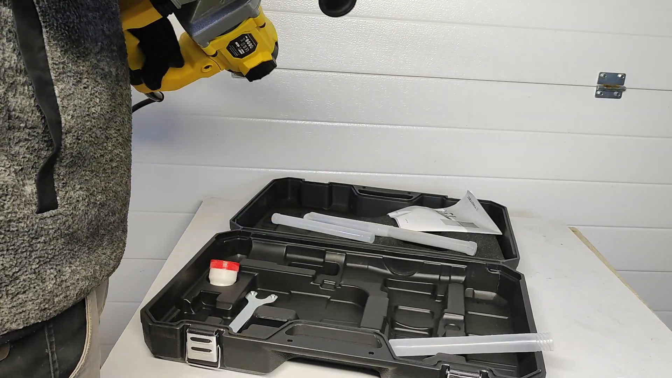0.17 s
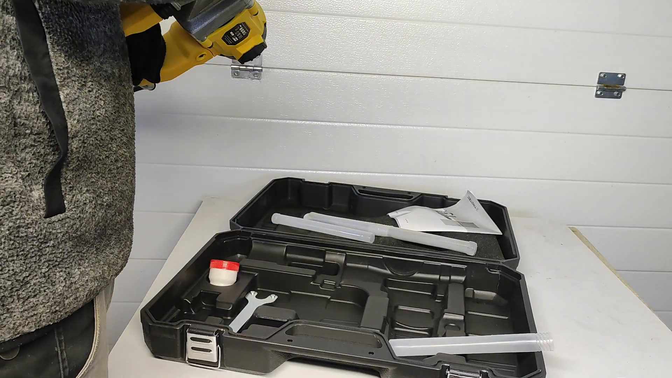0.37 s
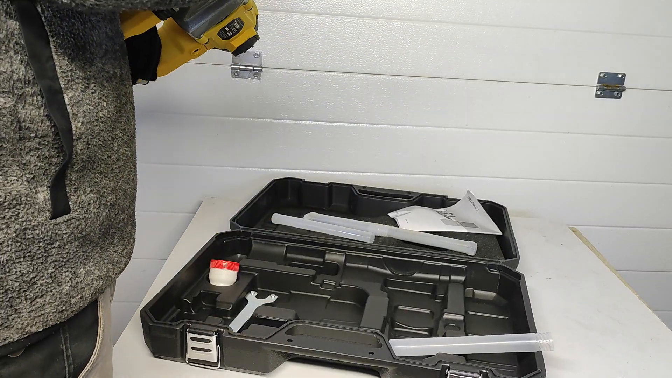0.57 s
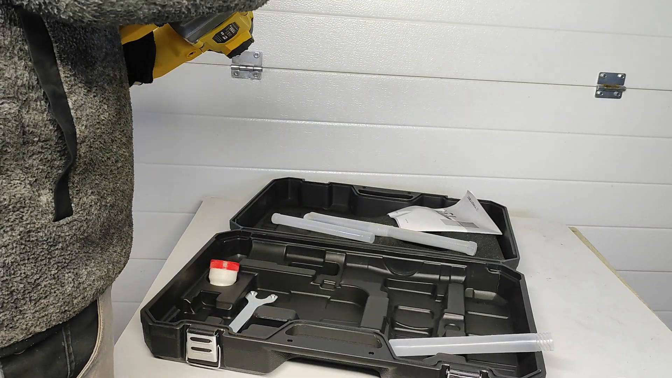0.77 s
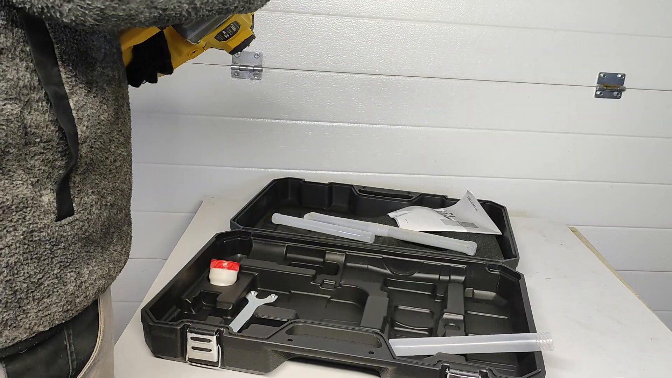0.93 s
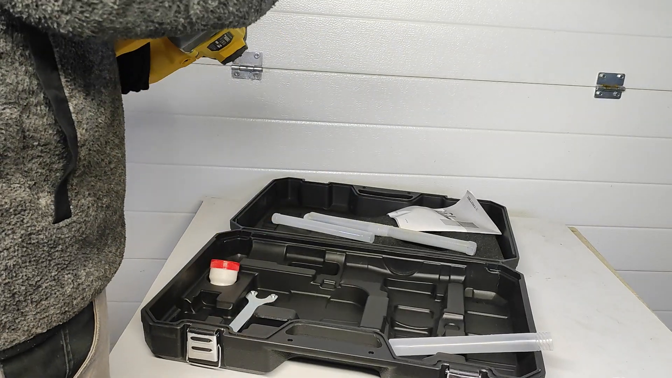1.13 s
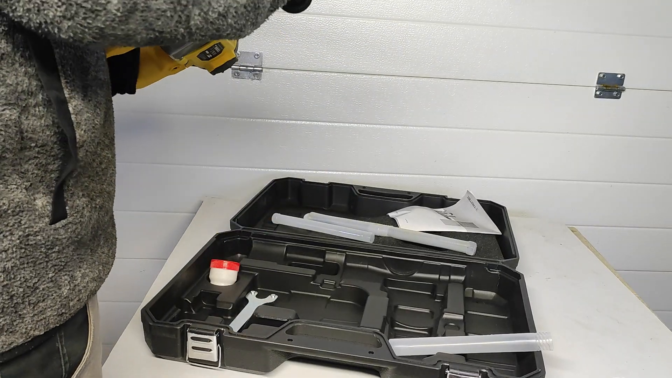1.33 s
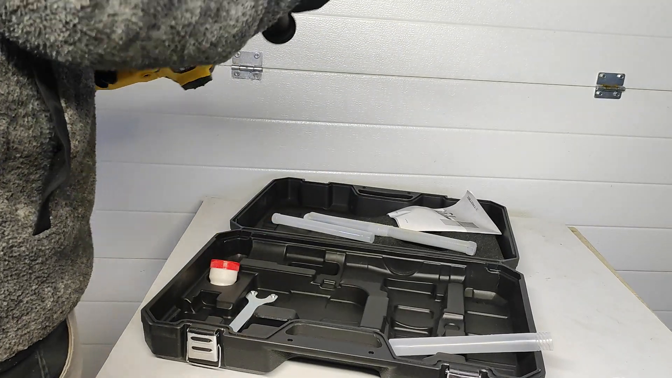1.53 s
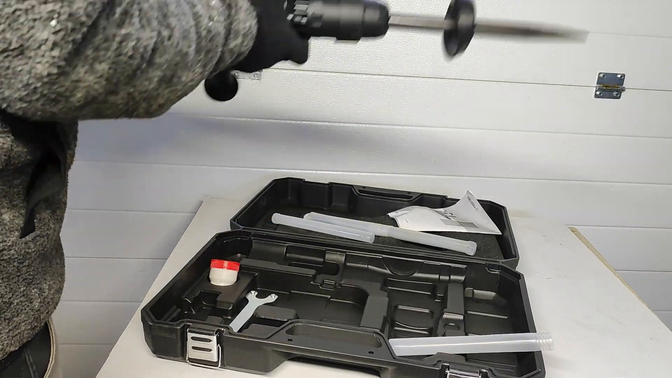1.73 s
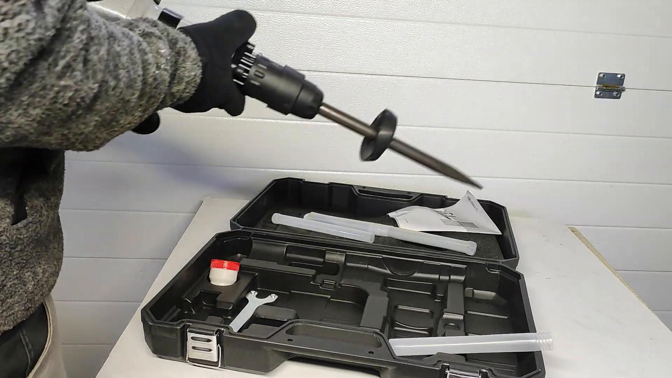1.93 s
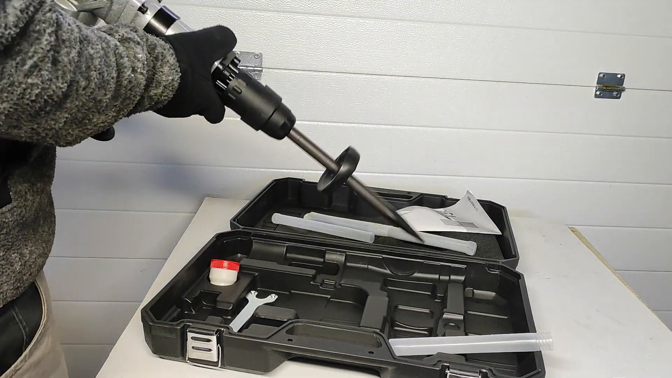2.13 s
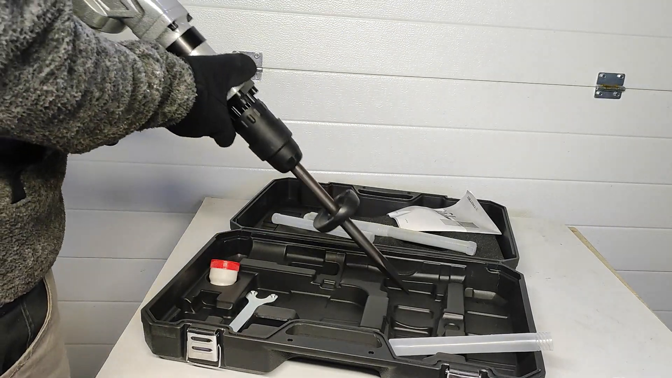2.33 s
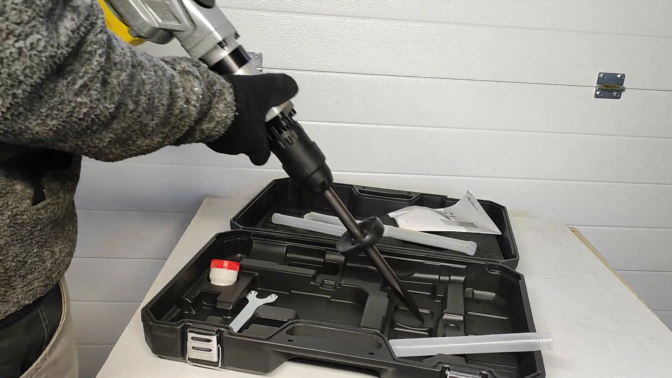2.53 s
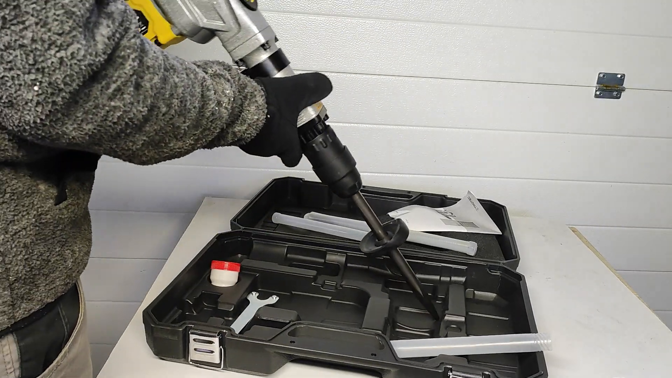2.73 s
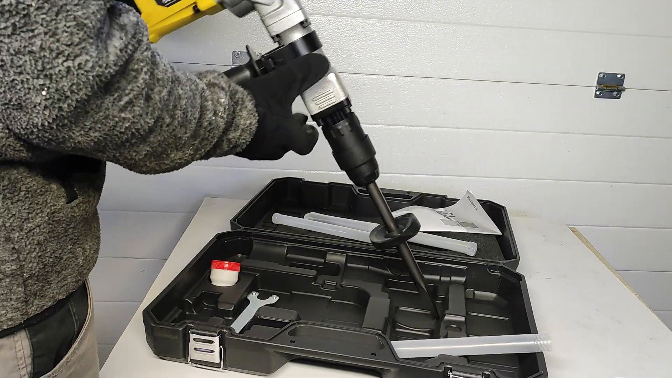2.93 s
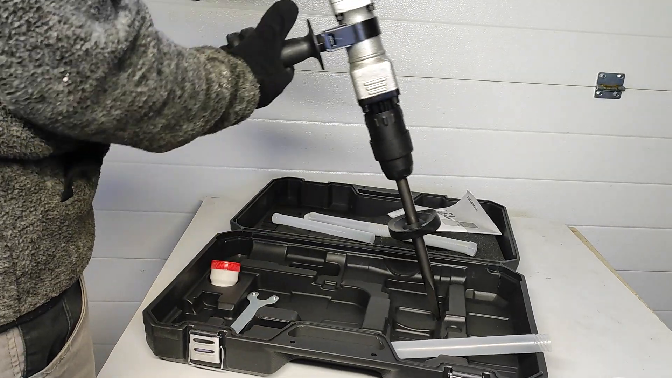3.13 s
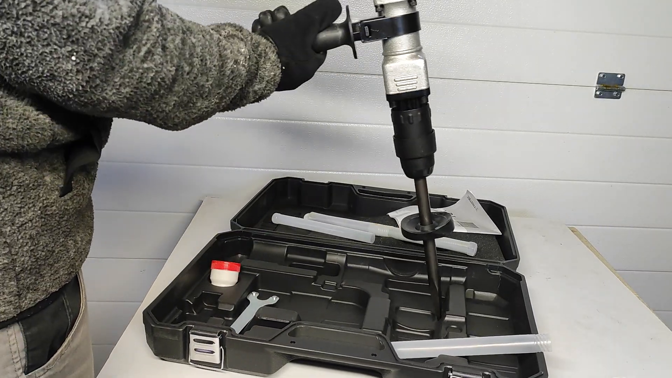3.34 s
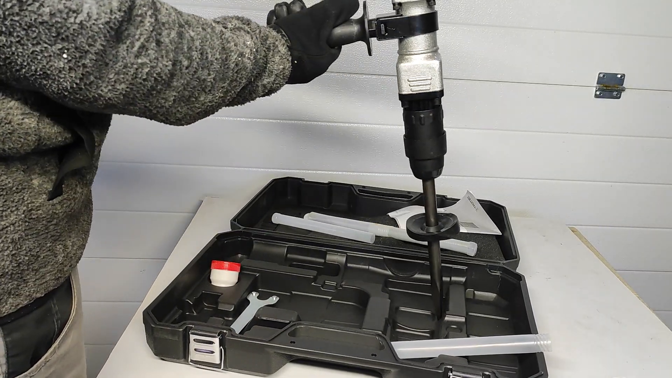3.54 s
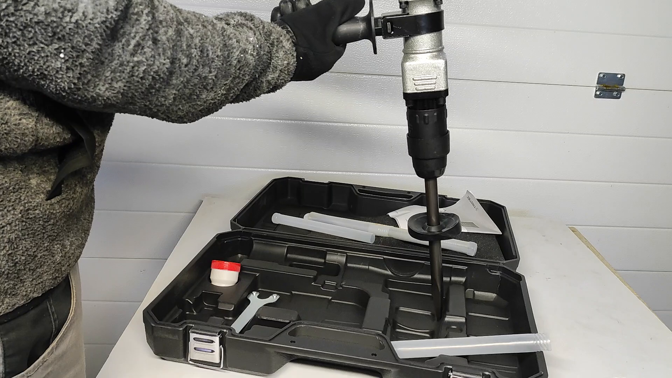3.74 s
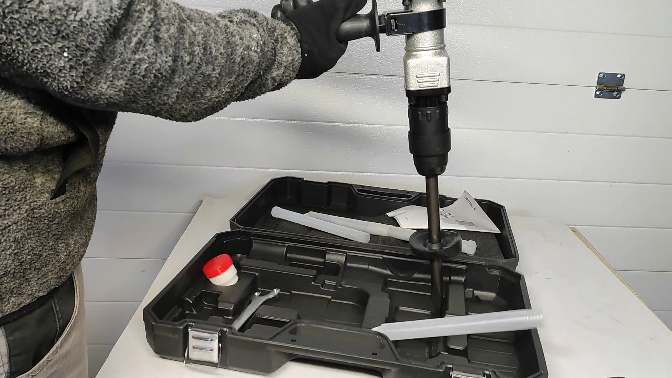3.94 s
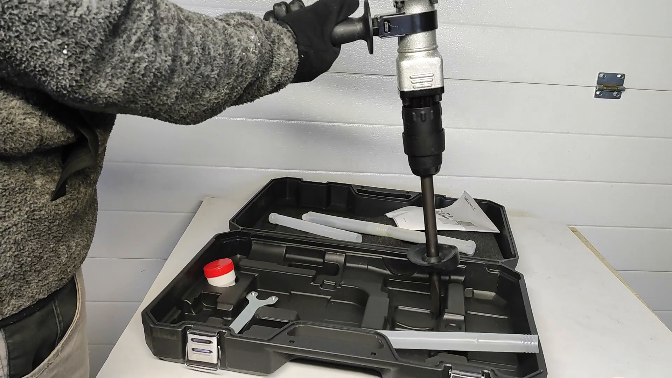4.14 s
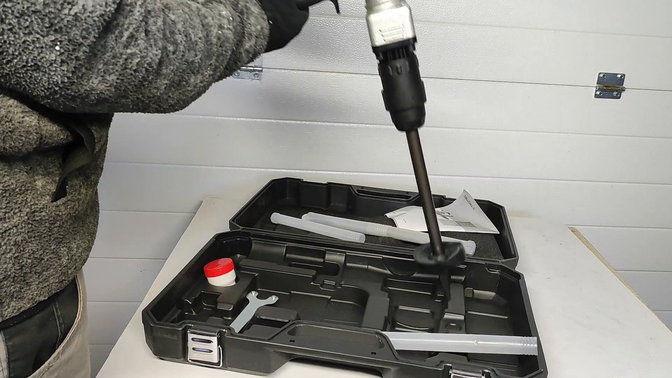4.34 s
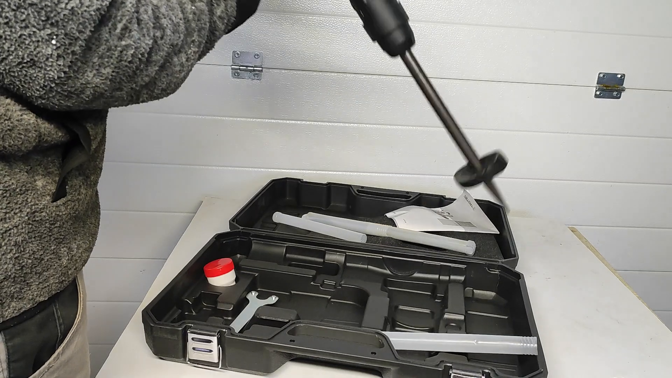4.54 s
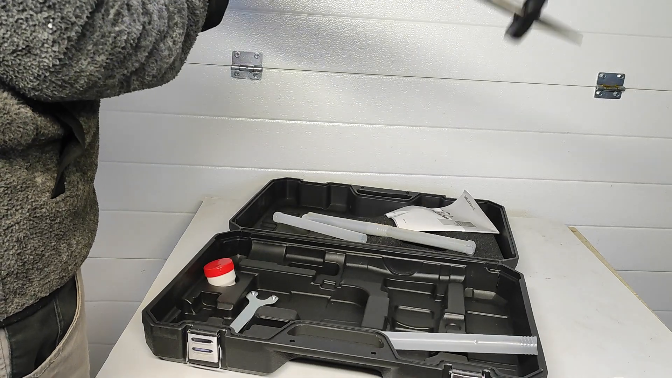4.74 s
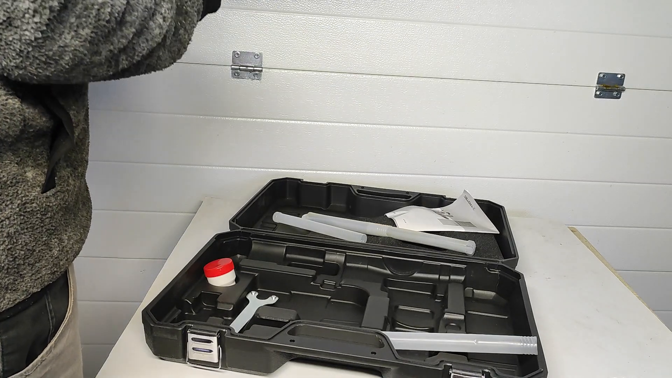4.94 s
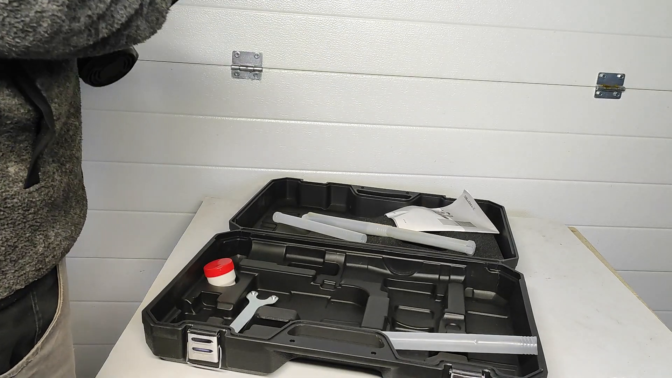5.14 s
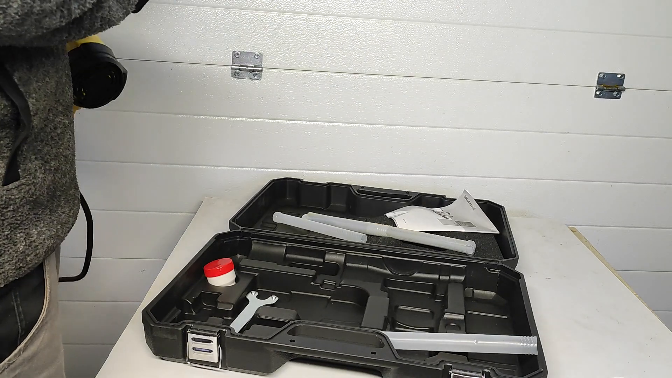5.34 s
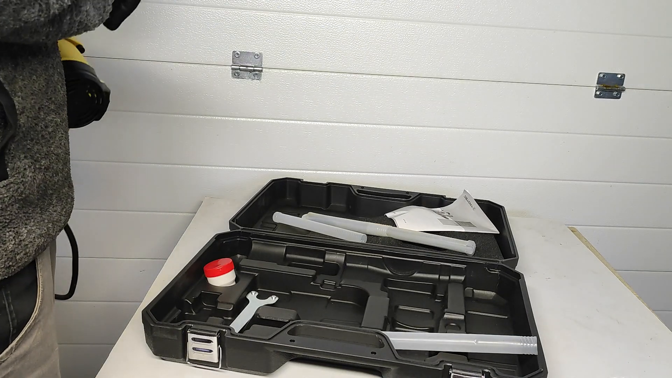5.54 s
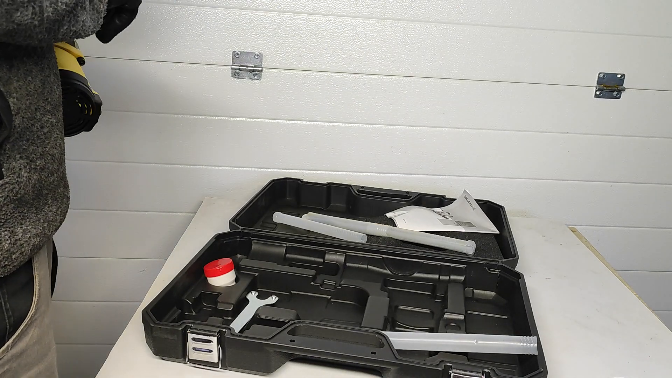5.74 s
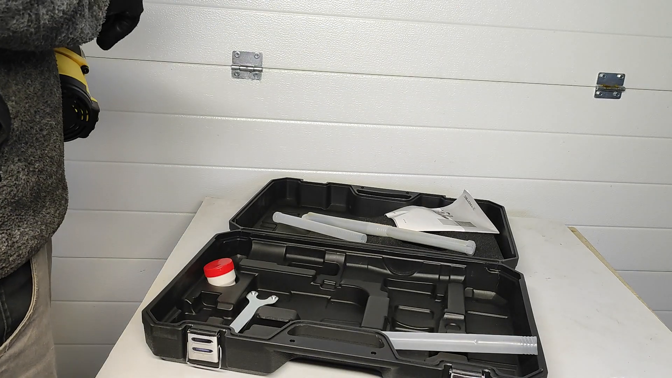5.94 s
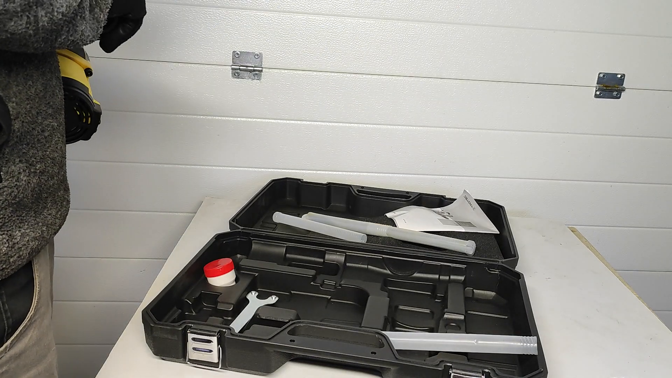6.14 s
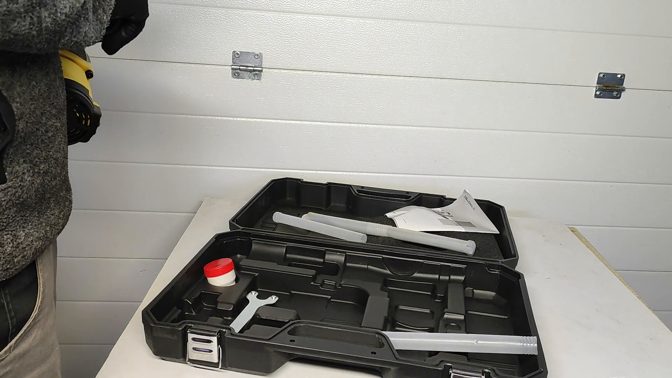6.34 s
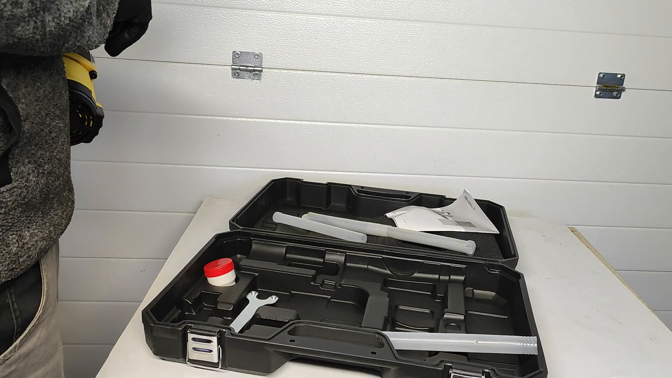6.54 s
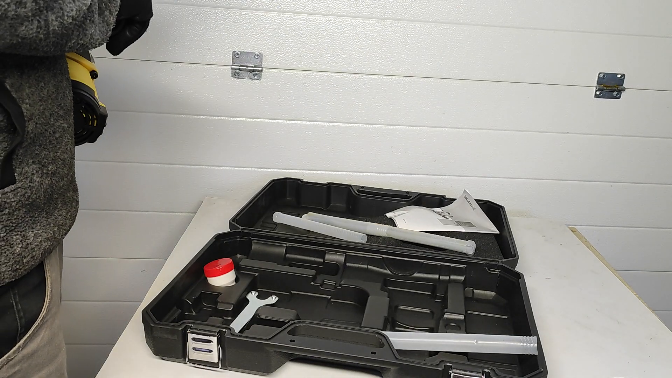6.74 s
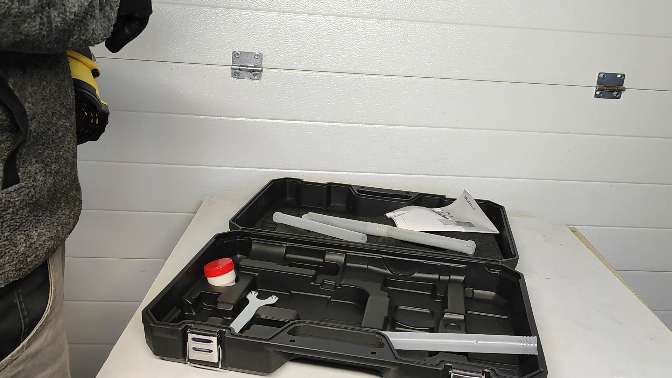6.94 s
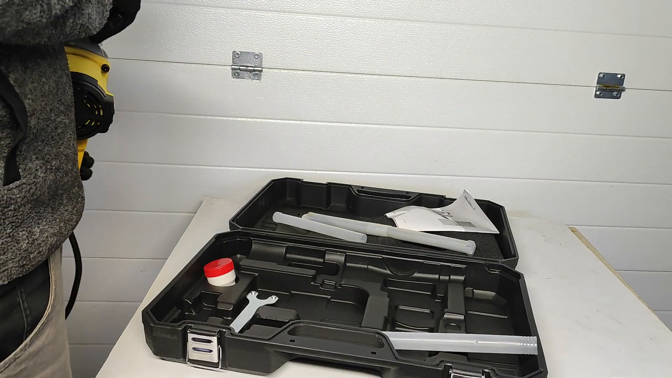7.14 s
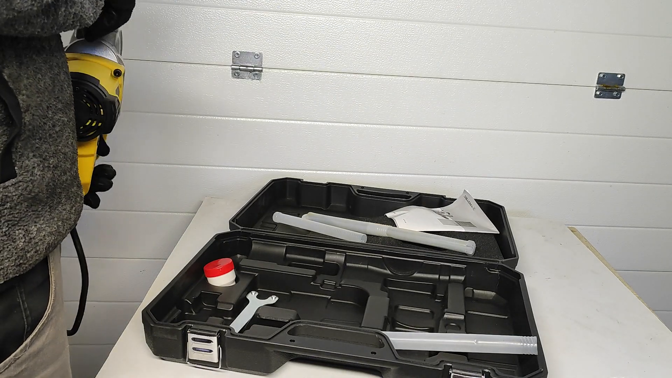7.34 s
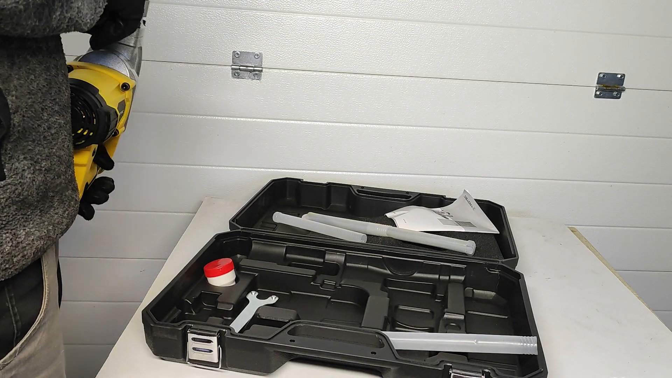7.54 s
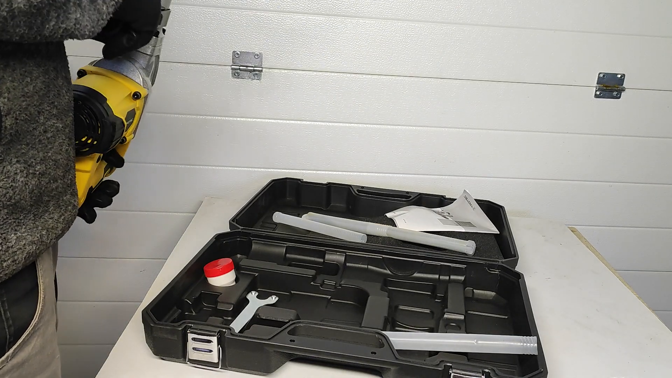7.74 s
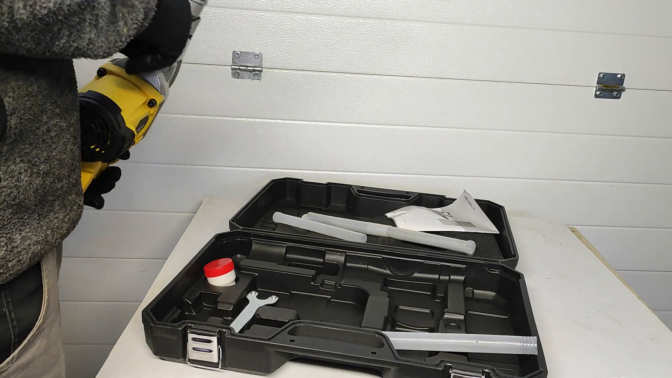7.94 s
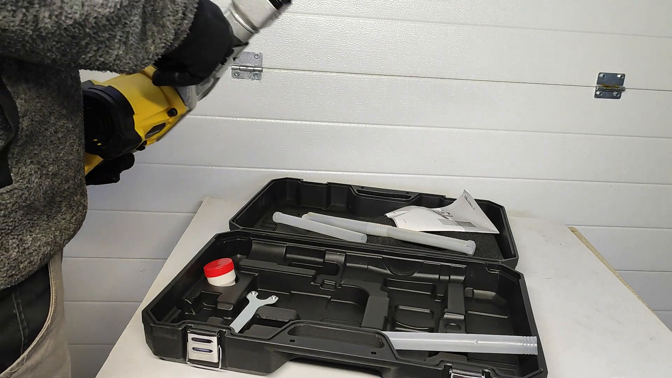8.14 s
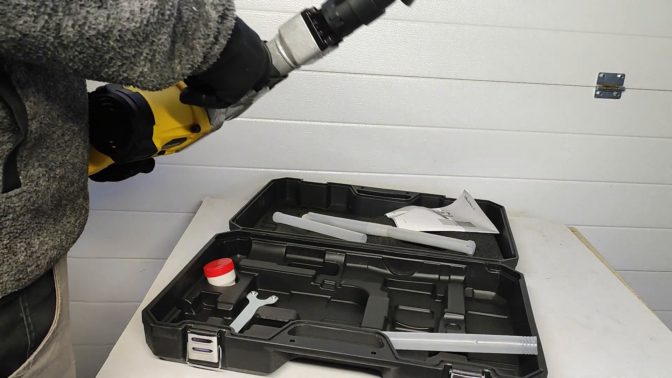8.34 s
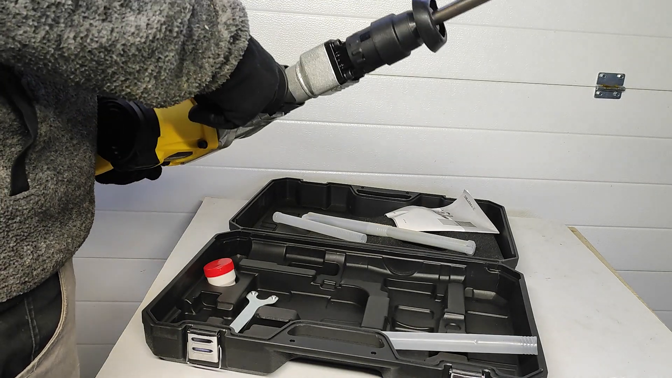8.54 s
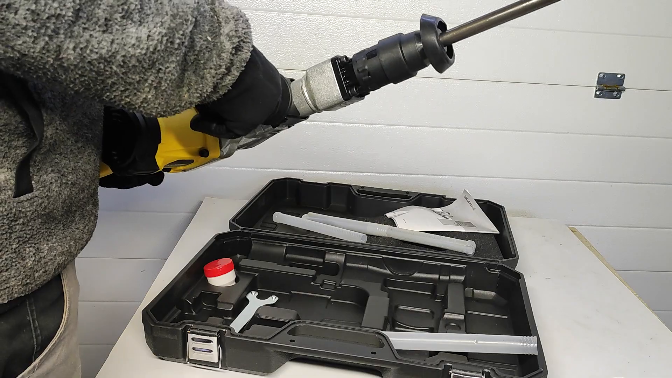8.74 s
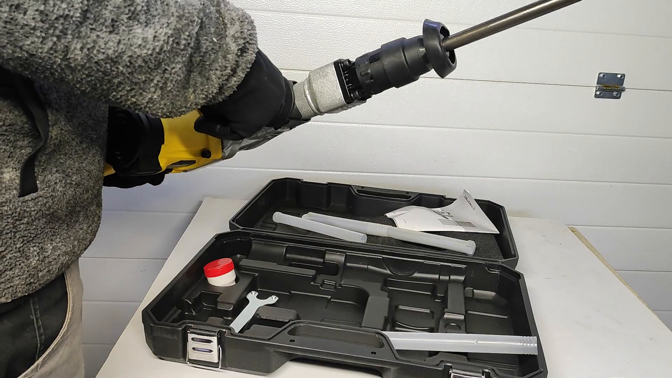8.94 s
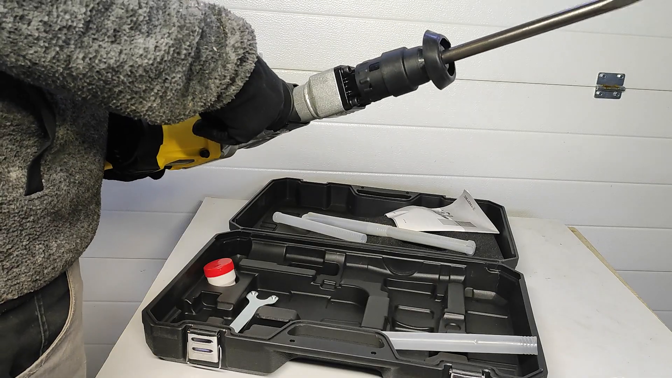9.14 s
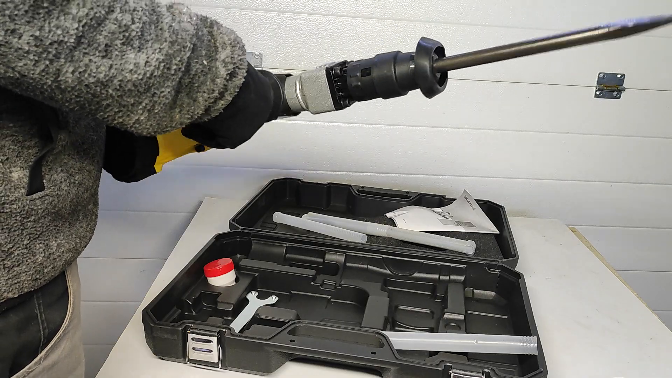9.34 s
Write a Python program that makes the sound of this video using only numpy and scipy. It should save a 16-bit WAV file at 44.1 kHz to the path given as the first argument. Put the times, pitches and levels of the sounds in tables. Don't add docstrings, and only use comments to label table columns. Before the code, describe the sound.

Harsh, gear-rattling motor bursts with whining run-downs, steel clinks and hollow plastic knocks, one short hammering on a case, and a distant engine revving.

```python
import sys
import numpy as np
from scipy import signal
from scipy.io import wavfile
from scipy.ndimage import uniform_filter1d, minimum_filter1d

SR = 44100
rng = np.random.default_rng(int(sys.argv[2]) if len(sys.argv) > 2 else 0)


def store_pcm(level_fs):
    pcm = np.round(np.clip(level_fs, -1, 1) * 32767).astype(np.int16)
    wavfile.write(sys.argv[1], SR, np.atleast_2d(pcm).T)


def gain_from_decibels(decibels):
    exponent = np.asarray(decibels, float) / 20
    return 10 ** exponent


N = 418509

# f/Hz, level/dB per Hz
CASING = [(180, -59), (300, -18.5), (430, -11), (570, -1), (760, 0.5), (927, -2), (1880, -3.5), (2370, 0),
          (2990, 4), (3710, 2), (4230, 2.5), (4960, 0), (5560, -1.5), (7650, -12), (9500, -24),
          (12400, -62), (20900, -120)]
# f/Hz, level/dB per Hz
FAN_COLOUR = [(4120, -22.5), (7000, -2), (7900, -6), (8800, -14), (9600, -10.5), (15000, -9.5),
              (16300, -27.5), (16800, -96)]
# f/Hz, level/dB per Hz
PLASTIC = [(150, -25.5), (250, -10), (615, -5), (703, -4.5), (2520, -11), (2790, -9.5), (5910, -13),
           (7000, -26), (7750, -12), (9000, -51), (11700, -45.5), (19800, -120)]
# f/Hz, level/dB per Hz
TICK = [(300, -22), (900, -4), (3000, -2), (6000, -1), (9000, -19), (16000, -24)]
BIT_HZ = [2137, 3800, 3852, 4990, 5809, 5852, 8105, 8165, 10765, 10830, 13705, 13780]
# f/Hz, level/dB, t60/s
LENGTHWISE = [(8558, 0, .16), (8597, -3, .16)]
# t/s, plastic level/dB, thud level/dB
HAMMERING = [(3.841, -13, -17), (3.877, -12, -13), (3.906, -22.5, -50), (3.937, -21.5, -14),
             (3.961, -13.5, -17.5), (3.983, -22, -17.5), (4.01, -9.5, -40.5), (4.04, -19, -18),
             (4.081, -26.5, -18), (4.112, -12.5, -13), (4.127, -18, -36), (4.167, -14, -23),
             (4.172, -25, -23), (4.234, -13, -25), (4.244, -14, -41), (4.256, -21, -42),
             (4.272, -26.5, -26), (4.34, -19.5, -21.5)]


def evened(x):
    return x / np.sqrt(np.mean(x ** 2) + 1e-20)


def read(points, hz):
    f, value = np.transpose(points)
    return np.interp(np.log(hz + 1), np.log(f + 1), value)


def colour(x, points):
    hz = abs(np.fft.fftfreq(8192, 1 / SR))
    log_gain = np.log(gain_from_decibels(np.maximum(read(points, hz), -90)))
    minimum_phase = np.exp(np.conj(signal.hilbert(log_gain)))
    response = np.fft.ifft(minimum_phase).real[:4096]
    return signal.oaconvolve(x, response / np.linalg.norm(response))[:len(x)]


def resonate(x, hz, width):
    r = np.exp(-np.pi * width / SR)
    return 2 * signal.lfilter([1 - r], [1, -r * np.exp(2j * np.pi * hz / SR)], x).real


def ring(impulses, modes):
    longest_s = min(max(t60 for *_, t60 in modes), 1.5)
    t = np.arange(0, longest_s, 1 / SR)
    tone = sum(gain_from_decibels(db - 60 * t / t60) * np.sin(2 * np.pi * hz * t) for hz, db, t60 in modes)
    return signal.oaconvolve(impulses, tone)[:N]


def train(times, db):
    out = np.zeros(N)
    np.add.at(out, np.round(np.asarray(times) * SR).astype(int), gain_from_decibels(db))
    return out


def puffs(times, db, t60):
    t = np.arange(SR // 4) / SR
    shape = gain_from_decibels(-60 * t / t60) * (1 - np.exp(-t / .0012))
    return rng.standard_normal(N) * signal.oaconvolve(train(times, db), shape)[:N]


def wobble(hz):
    smooth = signal.butter(2, hz, fs=SR, output="sos")
    return evened(signal.sosfilt(smooth, rng.standard_normal(N)))


def orders(turns, table):
    return np.sqrt(2) * sum(gain_from_decibels(db) * np.sin(2 * np.pi * k * turns + k) for k, db in table)


def air():
    # f/Hz, level/dB per Hz
    building = [(7.1, -27.5), (12, 1.5), (66, -21), (97, -7.5), (120, -22), (149, -15), (249, -12.5),
                (916, -23), (1400, -23.5), (6780, -35), (8900, -45), (15400, -41), (16800, -63.5)]
    # f/Hz, level/dB per Hz
    hiss_colour = [(7000, -33.5), (10000, -10), (13000, 1), (16000, 6), (17000, -35)]
    shared, left, right = (colour(rng.standard_normal(N), building) for _ in range(3))
    hiss = gain_from_decibels(-68.5) * np.array([colour(side, hiss_colour) for side in rng.standard_normal((2, N))])
    level = gain_from_decibels(-62.5 + 0.95 * wobble(5.8))
    return level * (0.97 * shared + np.array([left, 0.46 * right])) + hiss


def outside():
    # t/s, firing f/Hz, level/dB
    revs = [
        (4.701, 44.8, -74.5),
        (5.35, 49.05, -65.5),
        (5.55, 51.5, -61),
        (5.89, 57, -56.5),
        (6.479, 64.9, -60),
        (7.012, 73, -57.5),
        (7.48, 77.3, -56.5),
        (7.84, 79, -55),
        (8.15, 71, -58),
        (8.7, 52.2, -69),
    ]
    # multiple of firing rate, level/dB
    engine_orders = [(1, 0), (2, -3), (3, -10.5)]
    s, hz, db = np.transpose(revs)
    t = np.arange(N) / SR
    level = gain_from_decibels(np.interp(t, s, db, -99, -99) + 1.5 * wobble(6))
    turns = np.cumsum(np.interp(t, s, hz)) / SR
    return uniform_filter1d(level, size=8000) * orders(turns, engine_orders)


def handling():
    # loudest t/s, swell/s, fade/s, level/dB, low rumble level/dB
    moves = [(0.202, .5, 0.19, -75, -60), (2.261, 0.023, 0.066, -33.5, -51.5),
             (3.11, 0.11, 0.067, -46, -66.5), (3.275, 0.092, 0.18, -37.5, -45.5),
             (4.499, .1, 0.17, -45.5, -45.5), (5.07, 0.32, 0.33, -64, -63.5),
             (5.59, 0.14, 0.13, -39.5, -64), (6.1, 0.024, 0.065, -47.5, -57), (7.1, 0.13, 0.33, -64, -51),
             (7.5, 0.25, .1, -60, -56), (8.3, 0.11, 0.18, -57, -47.5)]
    # f/Hz, level/dB per Hz
    cloth_colour = [(120, -32), (200, -5.5), (519, -9.5), (1810, -3), (7270, -12), (8740, -22),
                    (14900, -20.5), (16000, -37.5)]
    # f/Hz, level/dB per Hz
    rumble_colour = [(20, -23), (50, -3), (100, 4.5), (200, -2.5), (400, -44)]
    t, rub, shake = np.arange(N) / SR, 0, 0
    for s, swell, fade, db, low_db in moves:
        down_db = 20 * np.where(t < s, (s - t) / swell, (t - s) / fade)
        rub = rub + gain_from_decibels(db - 7.5 - down_db)
        shake = shake + gain_from_decibels(low_db - 8.0 - down_db / 4)
    cloth = rub * gain_from_decibels(0.43 * wobble(40)) * colour(rng.standard_normal(N), cloth_colour)
    return cloth + shake * colour(rng.standard_normal(N), rumble_colour)


def jolts():
    side_db = [-16.5, -8.5]
    # f/Hz, level/dB per Hz
    stand = [(10, -9), (30, -8), (60, -9), (130, -5), (300, -30.5)]
    s, _, thud_db = np.transpose(HAMMERING)
    shared, left, right = (colour(puffs(s, thud_db, 0.087), stand) for _ in range(3))
    t = np.maximum(np.arange(N) / SR - s[0], 0)
    swing_turns = 1.25 * (1 - np.exp(-t / .32))
    drift = gain_from_decibels(-24) * np.exp(-t / .6) * np.sin(2 * np.pi * swing_turns)
    drift *= np.clip((5.08 - s[0] - t) / .1, 0, 1)
    return gain_from_decibels(np.c_[side_db]) * (shared + np.array([left, right])) - [[1], [0]] * drift


def taps():
    # t/s, level/dB, low note f/Hz, high note f/Hz, tick level/dB
    hollow_taps = [(2.25, -35, 261, 1640, -59.5), (2.638, -18, 603, 1780, -58),
                   (2.787, -18, 606, 1350, -58), (2.791, -17, 910, 1150, -55), (3.273, -24, 1574, 900, -59),
                   (3.275, -31.5, 4140, 3260, -53), (3.2764, -19.5, 890, 1550, -55.5),
                   (3.277, -35, 2540, 4100, -59.5), (3.284, -21, 760, 609, -61.5),
                   (3.297, -29, 1160, 703, -47.5), (3.309, -30, 649, 1107, -51.5),
                   (3.808, -15.5, 1025, 620, -33.5), (3.845, -12, 900, 582, -34),
                   (3.934, -12, 608, 1910, -49), (4.572, -42.5, 450, 1580, -54),
                   (4.639, -51, 695, 1400, -72), (6.092, -40, 469, 1330, -60)]
    # t/s, level/dB, note f/Hz
    pats = [
        (1.944, -31.5, 356),
        (2.026, -34.5, 313),
    ]
    s, *_, tick_db = np.transpose(hollow_taps)
    out = colour(puffs(s, tick_db + 11.0, 0.043), TICK)
    notes = [(at, db - 4.0, hz, .07) for at, db, hz in pats]
    for at, low_db, low_hz, high_hz, _ in hollow_taps:
        notes += [(at, low_db + 3.5, low_hz, .02), (at, low_db - 2.0, high_hz, .017)]
    t = np.arange(SR // 10) / SR
    soft_start = 1 - np.exp(-(t / .0016) ** 2)
    for at, db, hz, t60 in notes:
        note = gain_from_decibels(db + 6 - 60 * t / t60) * soft_start * np.sin(2 * np.pi * hz * t)
        out[round(at * SR):][:len(t)] += note
    return out


def skid():
    start_s, long_s = 3.81, 0.56
    u = (np.arange(N) / SR - start_s) / long_s
    level = gain_from_decibels(-34 - 6.5 * np.clip(u, 0, 1))
    shape = np.clip(u / 0.042, 0, 1) * np.clip((1 - u) / 0.45, 0, 1) * level
    return colour(shape * gain_from_decibels(3.0 * wobble(60)) * rng.standard_normal(N), PLASTIC)


def case():
    # t/s, plastic level/dB, thud level/dB, bit ring level/dB, lengthwise level/dB
    touches = [(2.637, -22, -13, -50, -56), (2.655, -19.5, -43.5, -23, -42), (2.789, -22, -18, -52, -67),
               (2.799, -25, -25.5, -29, -73), (2.806, -23.5, -37.5, -26.5, -63.5),
               (2.815, -31.5, -40, -30, -65), (2.828, -25.5, -46, -38, -70), (2.661, -20, -42, -28, -60),
               (2.671, -29, -44, -37, -60), (2.645, -27, -35, -37, -58.5), (2.92, -31.5, -59, -38.5, -78),
               (3.379, -41.5, -39, -56.5, -75), (3.79, -33.5, -56.5, -43, -56.5),
               (3.809, -16, -41.5, -26, -45), (3.821, -14, -37, -21, -54)]
    # f/Hz, level/dB per Hz
    thud_colour = [(12, -22.5), (25, -23), (60, -9.5), (115, 0.5), (180, -5.5), (450, -4.5), (800, -50)]
    # f/Hz, level over the thud/dB, t60/s
    table_boom = [(116, -31.5, 0.74)]
    # f/Hz, level/dB, t60/s
    resting_bit = [(3966, -1.5, 0.032), (4600, -32, 0.15), (6000, -2.5, 0.048), (6800, -21, 0.06),
                   (7760, -15.5, 0.22), (9000, -31, 0.043), (11130, -11.5, 0.16), (11700, -23.5, 0.26),
                   (13330, -5.5, 0.05), (13840, -12, 0.2), (14570, -15.5, .12), (15283, -13, 0.072)]
    first_s = HAMMERING[0][0]
    # the ring stays under the plastic, the lengthwise ring fades by 38 dB a second
    hammered = [(s, db, thud_db, db - 6.5, -17.5 - 38 * (s - first_s)) for s, db, thud_db in HAMMERING]
    s, db, thud_db, ring_db, axial_db = np.transpose(touches + hammered)
    crackle = gain_from_decibels(4 * wobble(400))
    out = colour(puffs(s, db + 1.0, 0.045) * crackle, PLASTIC)
    out += colour(puffs(s, thud_db - 10, 0.26), thud_colour)
    out += colour(puffs(s, ring_db, 0.023), FAN_COLOUR)
    out += ring(train(s, thud_db), table_boom)
    spread_db = 4 * rng.standard_normal((len(s), len(resting_bit)))
    scrape = gain_from_decibels(2.2 * wobble(60))
    for mode, by_db in zip(resting_bit, spread_db.T):
        out += scrape * ring(train(s, ring_db - 6 + by_db), [mode])
    return out, ring(train(s, axial_db), LENGTHWISE)


def trigger():
    # t/s, level/dB
    switch = [
        (0.3962, -31.5),
        (6.366, -21),
        (6.3766, -21.5),
        (7.5461, -23),
        (7.5764, 7),
        (8.6316, 0.5),
        (8.651, -10.5),
        (8.6637, 5),
        (8.72, 10),
        (8.8167, 9),
    ]
    # t/s, level/dB
    gear_lurches = [(.388, -35), (.396, -21.5), (0.413, -10.5), (0.436, -15), (7.534, -36), (7.544, -27),
                    (7.556, -13.5), (7.578, -7.5), (8.644, -16.5), (8.653, -16.5), (8.664, -16),
                    (8.719, -21), (8.792, -12), (8.816, -3), (8.891, -7)]
    s, db = np.transpose(switch)
    at, lurch_db = np.transpose(gear_lurches)
    clicks = signal.lfilter([1, -.8], [1], puffs(s, db - 15.5, 0.013))
    return clicks, colour(puffs(at, lurch_db, 0.06), CASING)


def bit():
    # level/dB, t60/s
    free_ring = [(-10.5, 0.43), (2.5, 0.27), (1, 0.4), (-18.5, .15), (2.5, 0.23), (-3, 0.46), (4.5, 0.15),
                 (-0.5, 0.17), (-5.5, 0.18), (-20, 0.073), (-1.5, 0.18), (-5.5, .16)]
    # t/s, level/dB, lengthwise level/dB, favoured f/Hz, share of the free ring time
    clinks = [(1.062, -23.5, -14.5, 5800, 4), (1.14, -7.5, -44.5, 11200, 0.46),
              (1.2597, -10.5, -41, 3800, 1), (1.3997, -6, -28.5, 7080, 0.52),
              (5.596, -10.5, -50, 3850, 0.53), (5.5958, -14, -52, 13700, 0.52),
              (5.6033, -14.5, -57.5, 10800, 0.3), (5.607, -36, -60, 2140, 0.65),
              (6.386, -9.5, -15, 8100, 0.48), (6.3862, -16, -50.5, 13700, 0.48),
              (6.393, -10, -38.5, 3790, 0.7), (6.406, -8.5, -37, 4460, 0.22),
              (6.4347, -7, -6.5, 6960, 0.36), (6.4721, -12.5, -44.5, 5900, 0.7),
              (6.469, -7, -47.5, 13700, 0.51), (7.9817, -9, -51, 5970, 0.5), (7.9807, -21, -42, 8060, 0.62),
              (7.9816, -22, -58, 13600, 0.3), (8.019, -25.5, -51, 3800, .9),
              (8.0534, -40.5, -62, 4960, 1.01), (8.689, -16, -8, 5830, 0.32), (8.718, -26, -30, 9000, 0.17)]
    s, db, axial_db, *_ = np.transpose(clinks)
    out = ring(train(s, axial_db - 8.5), LENGTHWISE) + colour(puffs(s, db - 11.0, 0.042), TICK)
    spread_db = .6 * rng.standard_normal((len(s), len(free_ring)))
    flutter = gain_from_decibels(1.3 * wobble(35))
    t = np.arange(SR // 2) / SR
    for (at, db, _, favoured_hz, free), row_db in zip(clinks, spread_db):
        k = round(at * SR)
        for m, (hz, (mode_db, t60), by_db) in enumerate(zip(BIT_HZ, free_ring, row_db)):
            away_db = 8.5 * abs(np.log2(hz / favoured_hz))
            top_db = db - 9.0 - away_db + by_db + mode_db
            tone = gain_from_decibels(top_db - 60 * t / (t60 * free)) * np.sin(2 * np.pi * hz * t)
            own_flutter = flutter[(k + 9000 * m + np.arange(len(t))) % N]
            out[k:k + len(t)] += tone * own_flutter
    return out


def controls():
    # t/s, held/s, speed aimed at f/Hz, rattle level/dB
    pulls = [(0.405, .49, 279.7, -9.5), (1.115, .18, 275.7, -10.5), (1.465, .095, 268.2, -9.5),
             (3.79, .21, 252.7, -22.5), (6.368, .17, 188.5, -16), (6.548, .085, 277.2, -12),
             (7.565, .2, 261.2, -10), (8.644, .13, 147.7, -24.5), (8.785, 0.14, 256.3, -12.5),
             (9.075, .15, 262.6, -11), (9.385, .2, 254, -12)]
    # t/s, friction as speed f/Hz, fan hiss level/dB, vent side level/dB
    poses = [
        (0, 218.9, -13, -32),
        (3, 269.6, 0, -18),
        (6, 332.4, -7, -4),
        (7.299, 288, -6, -0.5),
        (7.98, 290, -27, -15),
        (8.5, 270.2, -5.5, 5.5),
    ]
    spin_up_s, coast_s = .082, .9
    bite_s = 0.015
    t = np.arange(N) / SR
    speed, power, db, pose = np.ones(N), np.zeros(N), np.zeros(N), np.zeros((2, N))
    for s, held, aim_hz, pull_db in pulls:
        drag_hz = [hz for since, hz, *_ in poses if since < s][-1]
        k = round(s * SR)
        since_pull = t[k:] - s
        on = np.minimum(since_pull, held)
        off = np.maximum(since_pull - held, 0)
        rise = aim_hz + (speed[k] - aim_hz) * np.exp(-on / spin_up_s)
        speed[k:] = np.maximum((rise + drag_hz) * np.exp(-off / coast_s) - drag_hz, 1)
        power[k:] = (1 - np.exp(-on / bite_s)) * np.exp(-off / bite_s)
        db[k:] = pull_db
    for since, _, *pose_db in poses:
        pose[:, round(since * SR):] = np.c_[pose_db]
    fan_db, vent_db = uniform_filter1d(pose, size=2000)
    return speed, power, uniform_filter1d(db, size=800), fan_db, vent_db


def shifting(x):
    # f/Hz, width/Hz, loss/dB
    gaps = [(2436, 88, 6.5), (3585, 82, 6), (4225, 150, 6), (5490, 190, 12)]
    hz, t, z = signal.stft(x, SR, nperseg=1024, noverlap=768)
    patches = uniform_filter1d(rng.standard_normal(z.shape), size=5, axis=0)
    patches = uniform_filter1d(patches, size=11, axis=1)
    db = 2.8 * evened(patches)
    at = np.minimum(t * SR, N - 1).astype(int)
    for centre_hz, width, lost_db in gaps:
        now_hz = centre_hz * (1 + .035 * wobble(8)[at])
        depth = np.clip(1 + .5 * wobble(8)[at], 0, 2)
        db -= lost_db * depth * np.exp(-((hz[:, None] - now_hz) / width) ** 2)
    return signal.istft(z * gain_from_decibels(db - 3.5), SR, nperseg=1024, noverlap=768)[1][:N]


def motor():
    # f/Hz, width/Hz, level/dB
    casing_peaks = [(764.6, 85, -22.5), (1990, 1100, 1.5), (2460, 8.7, -2), (3420, 120, -7.5),
                    (3420, 33, -6), (3870, 110, 3), (4970, 530, -1), (6314, 220, -0.5), (5860, 79, 0.5),
                    (7500, 44, -7.5)]
    # f/Hz, level/dB per Hz
    hum_colour = [(24, -52), (40, -22), (70, -21.5), (129, -15.5), (222, 1.5), (304, -2.5), (500, -10.5),
                  (650, -26.5), (1100, -120)]
    # multiple of shaft speed, level over the hum/dB
    shaft_orders = [(1, -1.5), (2, -5.5), (3, -10.5)]
    # multiple of shaft speed, level/dB
    mesh_orders = [(6.916, -3), (13.68, 2), (12.8, -5.5), (6.75, -9.5), (12.1, -9.5), (7.04, -7),
                   (21.5, -11.5)]
    full_hz, knee_hz, kick_hz = 260, 150, 170
    crank_ratio = 6.1
    vent_hz, vent_width_hz = 5013, 610
    bounce, bounce_ms, sway_ms = .3, 3.5, .9

    shaft_hz, power, pull_db, fan_db, vent_db = controls()
    shake_hz = np.maximum(shaft_hz, kick_hz * power)
    halvings = np.log2(full_hz / shake_hz)
    lost_db = 5.5 * halvings + 11 * np.log2(np.maximum(knee_hz / shake_hz, 1))
    level_db = pull_db + 0.5 * power - lost_db
    fan_db = fan_db - 6.5 * halvings
    hum_db = -45.5 - lost_db - level_db
    mesh_db = -10 - 14 * halvings

    turns = np.cumsum(shaft_hz * (1 + .013 * wobble(30))) / SR
    strike_level = gain_from_decibels(1.5 * np.minimum(rng.exponential(1, N), 5))
    strikes = rng.standard_normal(N) * strike_level * (rng.random(N) < .15)
    crank = gain_from_decibels(1.3 * np.cos(2 * np.pi * turns / crank_ratio) + 0.69 * wobble(17))
    new_turn = np.diff(np.floor(turns / crank_ratio + .5), prepend=0) > 0
    slaps = new_turn * gain_from_decibels(15 + 4 * rng.standard_normal(N))
    chatter = evened(strikes) * crank + slaps

    rattle = colour(chatter, CASING)
    peaks = sum(gain_from_decibels(db) * resonate(rattle, hz, w) for hz, w, db in casing_peaks)
    rattle = evened(rattle + 0.47 * peaks)
    knocks = gain_from_decibels(9.9 * rng.standard_normal(N)) * (rng.random(N) < 25 / SR)
    rattle += gain_from_decibels(-23.0) * evened(ring(knocks, [(hz, -3, .08) for hz in BIT_HZ[4:8]]))
    vent = resonate(resonate(rattle, vent_hz, vent_width_hz), vent_hz, vent_width_hz)
    rattle = shifting(rattle + gain_from_decibels(vent_db) * vent)

    fan = gain_from_decibels(fan_db) * colour(rng.standard_normal(N) * crank, FAN_COLOUR)
    hum = gain_from_decibels(hum_db + 0.5) * colour(rng.standard_normal(N), hum_colour)
    coasting_db = -5 * (1.5 - power)
    mesh = gain_from_decibels(mesh_db + coasting_db + 1.4 * wobble(31)) * crank ** 1.1 * orders(turns, mesh_orders)
    shaft = gain_from_decibels(hum_db) * (shaft_hz / shake_hz) ** 2 * orders(turns, shaft_orders)
    level = gain_from_decibels(level_db) * uniform_filter1d(1. * (shaft_hz > 1), size=400)
    near, at = rattle + fan, np.arange(N)
    echo_at = at - SR / 1000 * (bounce_ms + sway_ms * wobble(1.5))
    near = near + bounce * np.interp(echo_at, at, near)
    return level * (near / np.sqrt(1 + bounce ** 2) + hum), level * (mesh + shaft)


def garage(x, count, wet_db):
    # f/Hz, t60/s
    decay = [(100, 0.36), (500, 0.55), (2000, 0.59), (6000, 0.43), (16000, 0.41)]
    # f/Hz, likeness
    likeness = [(60, 0.79), (200, 0.59), (500, 0.98), (1000, 0.04), (16000, 0.043)]
    sparse = np.zeros((2, SR))
    at = np.arange(200, SR - 20, 20) + rng.integers(0, 20, (2, (SR - 201) // 20))
    np.put_along_axis(sparse, at, rng.choice([-1., 1.], at.shape), 1)
    hz, t, z = signal.stft(sparse, SR, nperseg=256)
    alike = np.clip(read(likeness, hz), -1, 1)[:, None]
    z = np.array([z[0], alike * z[0] + np.sqrt(1 - alike ** 2) * z[1]])
    gather = 1 - np.exp(-t / 0.0076)
    fade = gain_from_decibels(-60 * t / read(decay, hz)[:, None])
    tail = signal.istft(z * gather * fade, SR, nperseg=256)[1]
    echoes = signal.fftconvolve(x[None], tail / np.linalg.norm(tail[0]), axes=1)[:, :N]
    direct = np.array([x, np.pad(x, (count, 0))[:N]])
    return (direct + gain_from_decibels(wet_db) * echoes) / np.sqrt(1 + gain_from_decibels(2 * wet_db))


def scene():
    noise, whine = motor()
    clicks, lurches = trigger()
    blows, lengthwise = case()
    tool = garage(noise + lurches + handling(), count=5, wet_db=1.0) + garage(whine, count=5, wet_db=-7.0)
    steel = garage(bit() + clicks, count=8, wet_db=-1.5)
    table = garage(blows + skid(), count=0, wet_db=0.5) + garage(taps() + lengthwise, count=0, wet_db=-6)
    return tool + steel + table + outside() * gain_from_decibels([[1.5], [-2.5]]) + air() + jolts()


def thinned(x):
    # f/Hz, level against the neighbourhood/dB
    drop_out = [(400, -30), (1000, -6.5), (2500, -4), (5000, 0), (9000, 1.8), (16000, .8)]
    hz, t, z = signal.stft(x, SR, "cosine", nperseg=2048, noverlap=1024)
    power = (abs(z) ** 2).sum(0) + 1e-14
    band_db = 10 * np.log10(abs(uniform_filter1d(power, size=5, axis=0)) + 1e-14)
    budget = uniform_filter1d(rng.standard_normal(power.shape), size=10, axis=0)
    budget_db = 3 * evened(uniform_filter1d(budget, size=3, axis=1))
    around_db = uniform_filter1d(band_db, size=120, axis=0)
    keep = band_db > around_db + read(drop_out, hz)[:, None] + budget_db
    strongest_db = -minimum_filter1d(-band_db, size=220, axis=0)
    local_db = -minimum_filter1d(-band_db, size=5, axis=0)
    keep &= (local_db > strongest_db - 19) | (hz < 6000)[:, None]
    total = power.sum(0)
    keep |= total > 8 * np.roll(total, 1)
    kept = z * np.maximum(keep, .003)
    return signal.istft(kept, SR, "cosine", nperseg=2048, noverlap=1024)[1][:, :N]


def top_cut(x):
    return signal.sosfilt(signal.butter(12, 16980, fs=SR, output="sos"), x)


def record(dry):
    top = signal.lfilter(*signal.butter(2, 11000, "high", fs=SR), dry)
    limited = np.clip(dry + top * [[.15], [-.15]], -1, 1)
    edge = signal.firwin(511, 15750, window=("kaiser", 8), fs=SR)
    mix = signal.oaconvolve(thinned(limited), edge[None], "same")
    return top_cut(mix)


dry = scene()
out = record(dry)
store_pcm(out)
```